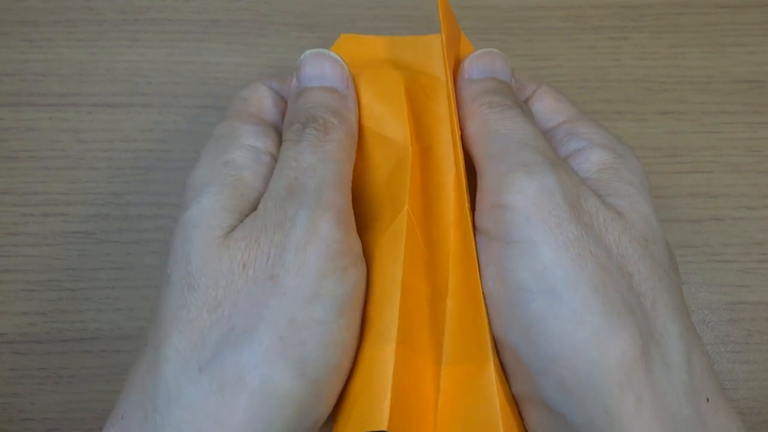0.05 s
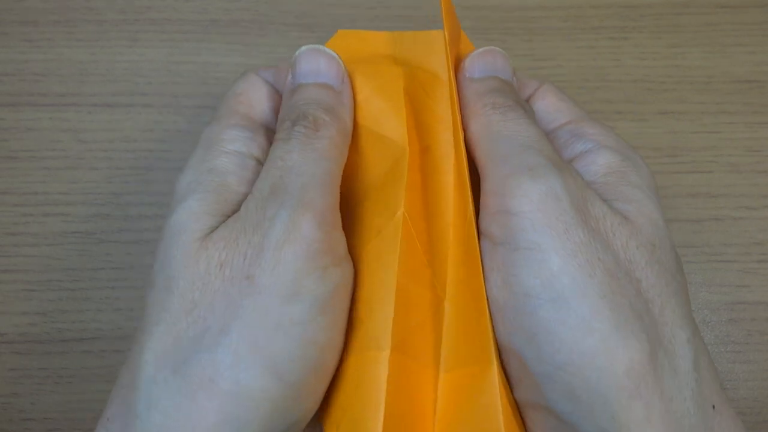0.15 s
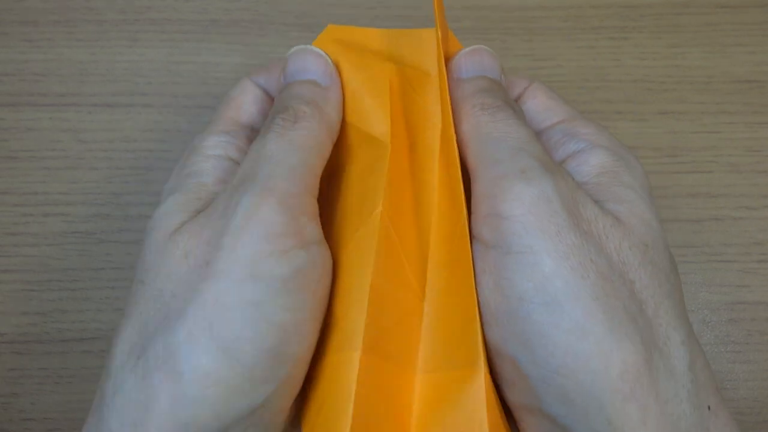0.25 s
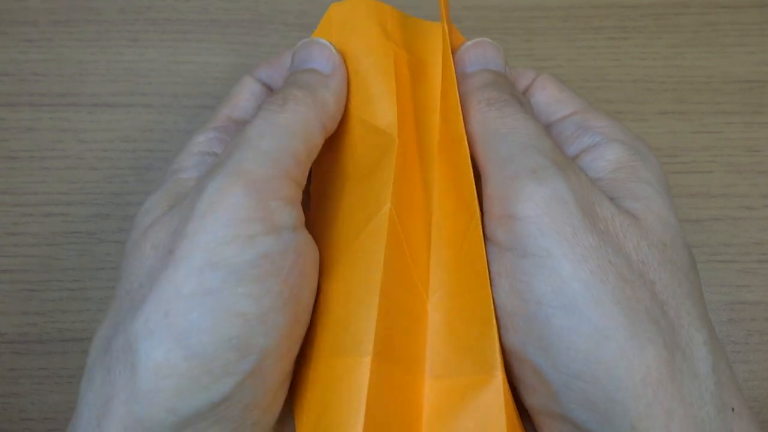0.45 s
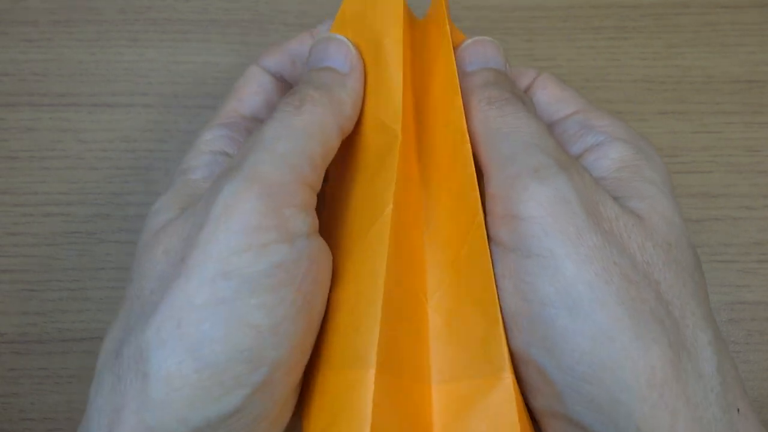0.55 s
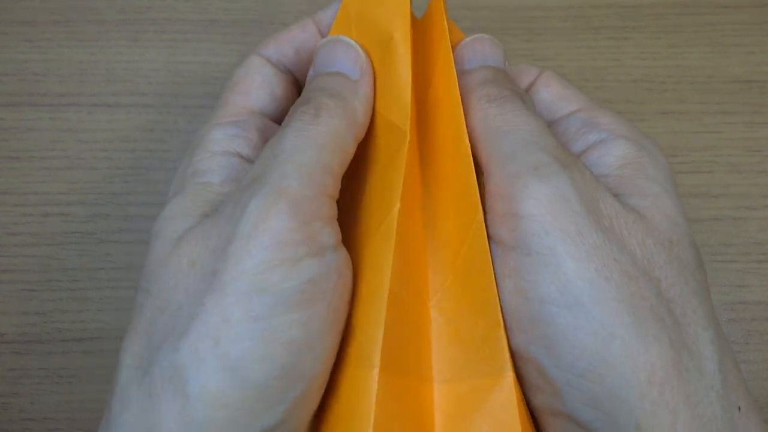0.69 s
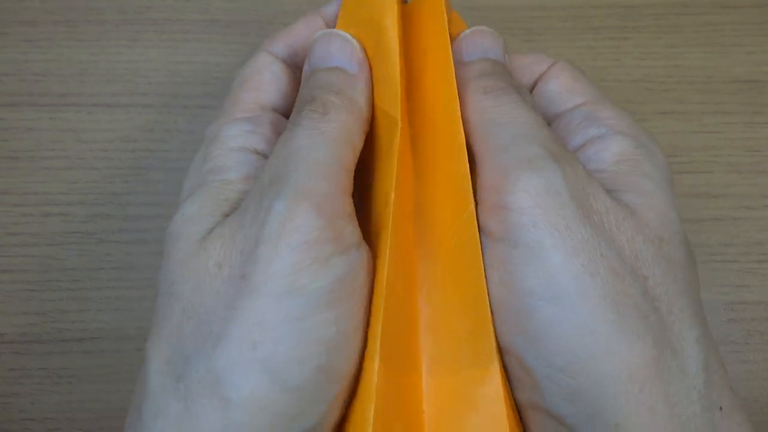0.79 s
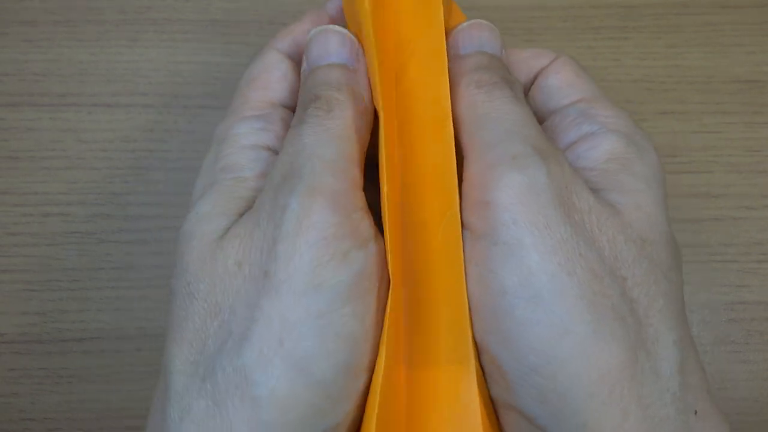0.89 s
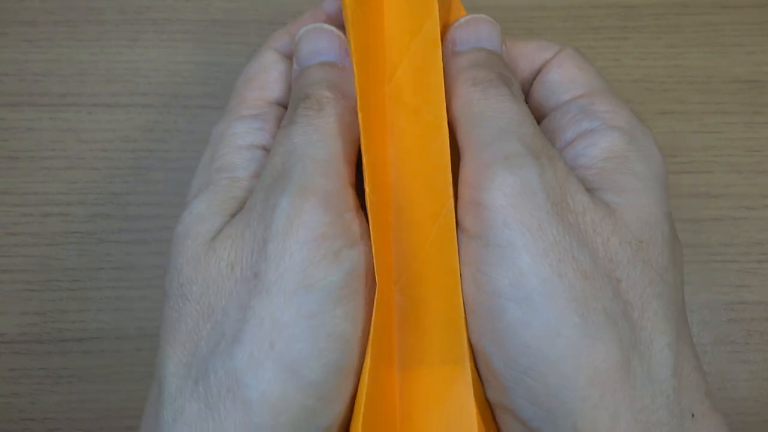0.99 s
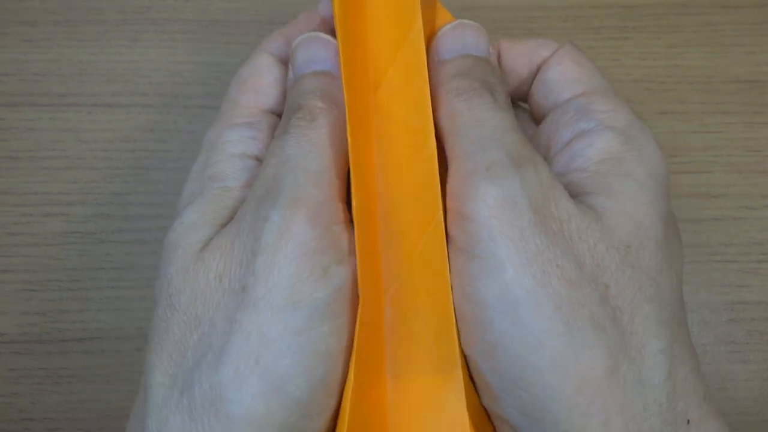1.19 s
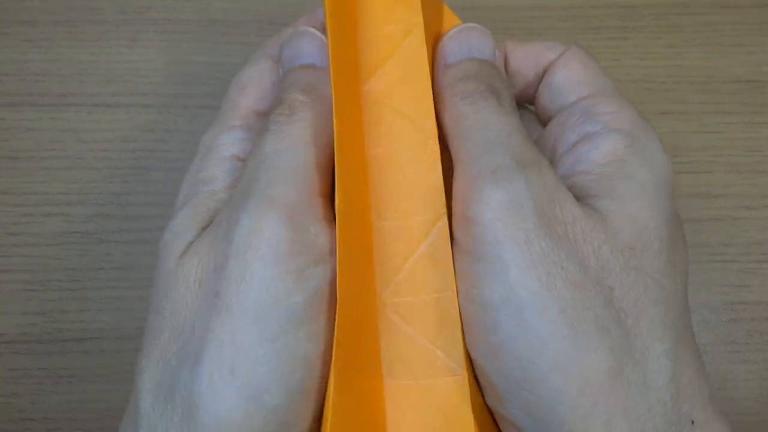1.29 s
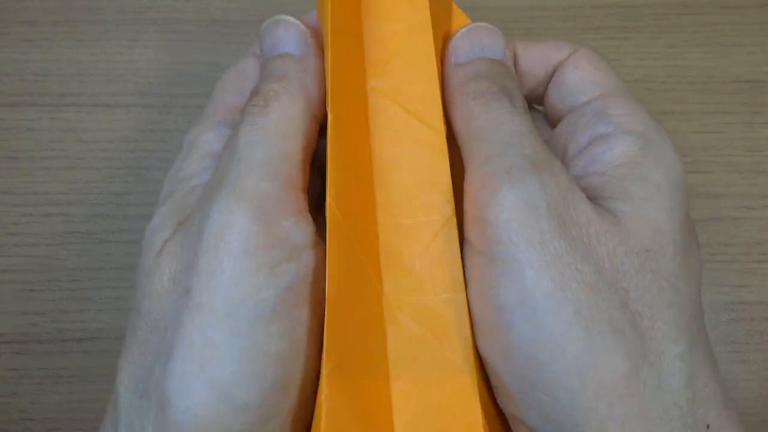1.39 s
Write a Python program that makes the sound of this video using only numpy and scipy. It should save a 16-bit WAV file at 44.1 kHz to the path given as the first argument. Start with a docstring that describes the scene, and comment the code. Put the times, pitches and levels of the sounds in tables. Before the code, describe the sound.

Stiff folded paper crackles sharply as hands press its creases together, with brief dry sliding rustles

```python
"""Buckling and sliding of folded paper

Two hands press a stiff, folded sheet together on a table, close to the microphone in a small room.
Creases buckle with sharp snaps: shaped noise bursts that ring a panel, some with a low flap of damped sines.
Paper slides on paper as a hiss of noise, fibre grains and creaks; once it catches in a short scrape of ticks.
The room answers faintly through a decaying-noise response, over its own quiet floor of coloured noise."""
import sys
import numpy as np
from scipy import signal
from scipy.fft import rfft, irfft
from scipy.io import wavfile
from scipy.ndimage import uniform_filter1d, map_coordinates

SR = 44100
rng = np.random.default_rng(int(sys.argv[2]) if len(sys.argv) > 2 else 0)


def inscribe(sig):
    """Save sig as 16-bit PCM at rate SR to the path in sys.argv[1].

    A 1-D sig is mono; a 2-D sig holds one channel per row.
    Samples are clipped to [-1, 1] before scaling.
    """
    pcm = np.round(np.clip(np.atleast_2d(sig).T, -1, 1) * 32767)
    wavfile.write(sys.argv[1], SR, pcm.astype(np.int16))


N = 63945  # length in samples
TOP_HZ = 11100  # upper band limit


def amp(db):
    """Level as a logarithm: decibels to amplitude ratio."""
    return 10 ** (np.asarray(db) / 20)


def unit(x):
    """Mean power: scale to rms 1."""
    return x / np.sqrt(np.mean(x ** 2) + 1e-20)


def along(points, hz):
    """Logarithmic frequency scale: interpolate (f/Hz, value) points on it."""
    f, values = np.transpose(points)
    f = np.maximum.accumulate(f)  # frequencies must not descend
    return np.interp(np.log(hz + 1), np.log(f + 1), values)


def colour(x, points, size=4096):
    """Minimum phase: a causal filter through (f/Hz, level/dB) points, by folding the cepstrum."""
    gain = amp(along(points, np.fft.rfftfreq(size, 1 / SR)))
    cepstrum = irfft(np.log(gain))
    cepstrum[1:size // 2] *= 2
    cepstrum[size // 2 + 1:] = 0
    impulse_response = irfft(np.exp(rfft(cepstrum)))
    return signal.fftconvolve(x, impulse_response)[:len(x)]


def add(track, s, x):
    """Superposition: mix x into the track at s seconds."""
    part = track[max(round(s * SR), 0):][:len(x)]
    part += x[:len(part)]


def fade(t, t60):
    """Exponential damping: decay by 60 dB in t60 seconds."""
    return np.exp(-np.log(1000) * t / t60)


def burst(envelope, count=3):
    """Broadband impulse: enveloped noise of energy 1, its spectrum evened out in a few passes."""
    x = rng.standard_normal(len(envelope)) * envelope
    for _ in range(count):
        z = rfft(x)
        local_power = uniform_filter1d(abs(z) ** 2, size=60)
        x = irfft(z / np.sqrt(abs(local_power) + 1e-12), len(x))
        x = x * (envelope > envelope.max() / 1000)
    return x / np.linalg.norm(x)


def grains(rate):
    """Random point process: sparse impulses of uneven size, rate per second, rms 1."""
    struck = rng.random(N) < rate / SR
    return unit(struck * rng.standard_normal(N))


# spectrum of the room's quiet air: f/Hz, relative level/dB
AIR_SPECTRUM = [(25, -28.5), (70, -27.5), (120, -18), (200, -11.5), (340, 1), (550, -10.5), (900, 2),
                (1250, -10), (1750, -1.5), (2100, -15.5), (2700, -6.5), (4000, -12.5), (11000, -37.5)]
FLOOR_DB, FLOOR_SIDE_DB = -65, -7  # rms of the mid; side relative to mid


def floor():
    """Stationary random noise: the quiet air of the room, partly incoherent between the channels."""
    mid, side = [unit(colour(rng.standard_normal(N), AIR_SPECTRUM)) for _ in range(2)]
    side = amp(FLOOR_SIDE_DB) * side
    return amp(FLOOR_DB) * np.array([mid + side, mid - side])


# course of the sliding of paper on paper: t/s, hiss level before its waver/dB
SLIDE_COURSE = [(0, -55.5), (.07, -66), (.11, -64.5), (.16, -54.5), (.2, -45.5), (.245, -41.5),
                (.29, -44.5), (.318, -44), (.35, -39), (.385, -45.5), (.415, -51.5), (.465, -45),
                (.505, -41), (.52, -57.5), (.57, -39), (.58, -40), (.63, -53), (.665, -52), (.7, -41),
                (.72, -46), (.77, -47), (.81, -55.5), (.87, -55), (.91, -59), (1.02, -69.5), (1.1, -63),
                (1.17, -70.5), (1.36, -75.5), (1.41, -61), (1.45, -70)]
# spectrum of the friction hiss: f/Hz, relative level/dB
HISS_SPECTRUM = [(100, -34.5), (300, -6.5), (600, -10.5), (1000, 0.5), (1500, 2), (2500, 4), (4000, 4.5),
                 (6500, 4), (9000, 4.5), (11000, 4.5)]
# spectrum of the faint creaks of the bent sheet: f/Hz, relative level/dB
CREAK_SPECTRUM = [(100, -44.5), (400, -15), (750, 2), (1500, -7.5), (2700, -0.5), (4500, -4),
                  (11000, -29.5)]
FIBRES_PER_S, FIBRE_DB = 1100, -12  # grain level relative to the smooth noise
CREAKS_PER_S, CREAK_DB = 110, -11  # relative to the mid hiss
PAPER_SIDE_DB, SLIDE_WAVER_DB = -11, 1  # side relative to the mid hiss; size of the level waver


def slide():
    """Sliding friction: brushing fibres give a hiss, with fine grains and faint creaks, that follows the slide."""
    t = np.arange(N) / SR
    waver = map_coordinates(rng.standard_normal(400), [t * 60])  # 60 random values a second, smoothly joined
    level = amp(np.interp(t, *np.transpose(SLIDE_COURSE)) + SLIDE_WAVER_DB * waver)
    friction = rng.standard_normal(N) + amp(FIBRE_DB) * grains(FIBRES_PER_S)
    mid_spectrum = HISS_SPECTRUM + [(TOP_HZ + 500, -6), (TOP_HZ + 2000, -40)]
    hiss = unit(colour(friction, mid_spectrum))
    side = amp(PAPER_SIDE_DB) * unit(colour(rng.standard_normal(N), HISS_SPECTRUM))
    creaks = amp(CREAK_DB) * unit(colour(grains(CREAKS_PER_S), CREAK_SPECTRUM))
    mid = hiss + creaks
    return level * np.array([mid + side, mid - side])


# reverberation time of the room: f/Hz, T60/s
REVERBERATION = [(200, 0.99), (800, 0.52), (2700, 0.35), (6000, 0.29), (11000, .17)]
ROOM_DB, ROOM_DELAY_S = -19, 0.007  # tail level; the tail fades in from 0.5 to 1.5 delays
WALLS_DB, WALLS_T60_S = -19.5, .035  # early echoes
ROOM_SIDE_DB = -2.5  # gain of the side response


def room(x):
    """Reverberation as convolution: early echoes from the table and near things, then a short tail."""
    hz, t, z = signal.stft(rng.standard_normal((2, SR // 2)), SR, nperseg=256)
    decay = fade(t, along(REVERBERATION, hz)[:, None])
    tail = signal.istft(z * decay, SR, nperseg=256)[1]
    t = np.arange(tail.shape[1]) / SR
    tail = tail * np.clip(t / ROOM_DELAY_S - .5, 0, 1)
    mid, side = amp(ROOM_DB) * tail / np.linalg.norm(tail[0])
    sparse = rng.standard_normal(tail.shape) * (rng.random(tail.shape) < .1)
    early = sparse * fade(t, WALLS_T60_S) * (t > .001)
    early = amp(WALLS_DB) * early / np.linalg.norm(early, axis=1, keepdims=True)
    mid = mid + early[0]
    side = amp(ROOM_SIDE_DB) * (side + early[1])
    response = np.array([mid + side, mid - side])
    return signal.fftconvolve(x[None], response, axes=1)[:, :N]


# buckling creases: t/s, crack time scale/ms, shiver drive level/dB, lowest panel resonance f/Hz,
# body level/dB, hollow level above the mean of body and mid/dB, mid level/dB, bite level/dB,
# fizz level/dB, ring f/Hz, ring level/dB
CREASE_SNAPS = [ (.1954, 0.67, -6.5, 954, -9.5, 5.5, -9, 1, -26, 2720, -1.5),
                (.2275, 0.66, 1, 1140, -14, 3, -22, -15, -13, 2900, -8),
                (0.2325, 1.8, -20, 1080, -5, 3, -5, -19.5, -17, 1470, 5.5),
                (.2775, 0.51, -2.5, 900, -6.5, 2, -9.5, -14, -10, 1723, -3),
                (0.3225, 1.4, 12, 970, -13.5, 3, -9, -25, -26.5, 1260, -16),
                (0.323, 1.22, -7.5, 1050, -1.5, 8, 4, 3.5, 13, 5850, 5.5),
                (0.5548, 0.66, -9.5, 1020, 2.5, -13, 14, 14, 9, 3564, 8),
                (.7047, 2.9, -10, 750, -4, -5, 0.5, -0.5, 0.5, 10000, 2.5),
                (0.7365, 0.94, -6, 1000, 6, -5.5, 10, 8.5, 9.5, 6250, -2),
                (0.8142, 1.26, -5, 985, 5, -6.5, -0.5, 3, -7, 2630, 5.5),
                (.8412, 1.8, -13, 850, -7.5, -11, -31, -28, -32, 2700, -8),
                (0.8566, 1, 4, 730, -15.5, -1.5, -9, -19.5, -21, 3330, -12),
                (.8690, 0.59, -0.5, 830, -16, 9, -44, -31, -26, 950, -8),
                (.8804, 0.9, -4.5, 650, -5, -4, 4.5, -1, -5, 2850, 7),
                (.9770, 7.5, -0.5, 604, -22, -6, -21, -28, -29, 855, -20),
                (1.0970, 6.2, -6, 873, -22, -8, -25, -23.5, -26.5, 3020, -14),
                (1.4425, 1.4, -1, 740, -3.5, -13, -11, -11.5, -62, 1360, -3)]
BODY_HZ, MID_HZ, BITE_HZ, FIZZ_HZ = 1150, 2480, 3900, 8500  # where the four levels of a snap apply
HOLLOW_HZ = 1550  # where the hollow in a snap's spectrum lies, as from its reflection off the table
# relative to the body: at the lowest resonance, one octave and three octaves under it
PANEL_DB, BELOW_DB, DEEP_DB = 5.5, -13, -27
CRACK_DB = -3.7  # drive level of the crack
SHIVER_T60_S, SHIVER_TOP_HZ = 0.027, 10400  # the shiver is a little duller than the crack
RING_Q = 4.2  # of each of two resonator passes: paper damps its panels quickly


def snaps(size=4096):
    """Snap-through buckling: a crease gives a short crack, the shiver of the sheet and one ringing panel."""
    out, t = np.zeros(N), np.arange(size) / SR
    dull = signal.butter(1, min(SHIVER_TOP_HZ, SR / 2 - 1), fs=SR)
    for s, ms, shiver_db, low_hz, body, hollow, mid, bite, fizz, ring_hz, ring_db in CREASE_SNAPS:
        u = t / (ms / 1000)  # time in crack lengths
        crack = burst(np.sqrt(u + 1e-4) * np.exp(-1.6 * u ** 2))
        shiver_envelope = fade(t, SHIVER_T60_S) * (1 - np.exp(-u ** 2))
        shiver = signal.lfilter(*dull, burst(shiver_envelope))
        force = amp(CRACK_DB) * crack + amp(shiver_db) * shiver
        shape = [
            (low_hz / 8, body + DEEP_DB), (low_hz / 2, body + BELOW_DB),
            (low_hz * 0.79, body - 5), (low_hz, body + PANEL_DB),
            (BODY_HZ, body), (HOLLOW_HZ, (body + mid) / 2 + hollow),
            (MID_HZ, mid), (BITE_HZ, bite), (FIZZ_HZ, fizz)]
        panel = signal.iirpeak(ring_hz, RING_Q, fs=SR)
        ring = signal.lfilter(*panel, signal.lfilter(*panel, force))
        add(out, s, colour(force, shape) + amp(ring_db) * ring)
    return out


# flexing of the whole sheet under the hard snaps: t/s, f/Hz, level before rise and damping/dB
SHEET_FLEXES = [(.2774, 706, -26), (0.3237, 363, -45), (0.555, 364, -41), (.7062, 683, -25.5),
                (.7366, 454, -23), (0.8155, 427, -29), (0.8793, 682, -28.5)]
FLEX_T60_S, FLEX_RISE_S = .018, .0012


def flexes():
    """Damped free vibration: the low, quickly dying flap of the whole sheet."""
    out, t = np.zeros(N), np.arange(SR // 10) / SR
    envelope = fade(t, FLEX_T60_S) * (1 - np.exp(-t / FLEX_RISE_S)) ** 2
    for s, hz, db in SHEET_FLEXES:
        add(out, s, amp(db) * np.sin(2 * np.pi * hz * t) * envelope)
    return out


# stick-slip scrapes: t/s, length before the decay/s, rms level of the ungated ticks/dB, spectral peak f/Hz
EDGE_SCRAPES = [(0.48, 0.0054, -36.5, 3080), (0.488, 0.0057, -35.5, 2540), (0.4937, 0.0031, -32, 2015),
                (.5005, 0.0045, -33.5, 5410)]
SLIPS_PER_S, SLIP_SCATTER_DB = 1500, 4  # mean rate; standard deviation of the slip sizes
SCRAPE_SKIRT_DB, SCRAPE_T60_S = -17, .016  # level at 3.5 times the peak frequency; final decay


def scrapes(count=120):
    """Stick-slip friction: an edge catches and slips in a rapid, uneven train of ticks."""
    out, t = np.zeros(N), np.arange(SR // 10) / SR
    for s, length, db, hz in EDGE_SCRAPES:
        intervals = (rng.exponential(size=count) + 1) / 2 / SLIPS_PER_S
        times = np.cumsum(intervals)
        sizes = amp(SLIP_SCATTER_DB * rng.standard_normal(count)) * rng.choice([-1, 1], count)
        slips = np.bincount((times * SR).astype(int), sizes, minlength=len(t))[:len(t)]
        shape = [(hz / 20, -45), (hz / 6, -22), (hz * 0.53, -9), (hz * 0.91, -1),
                 (hz, 0), (hz * 3.5, SCRAPE_SKIRT_DB)]
        ticks = colour(slips, shape)
        gate = np.clip(t / 0.0013, 0, 1) * fade(np.maximum(t - length, 0), SCRAPE_T60_S)
        add(out, s, amp(db) * gate * ticks / np.std(ticks[t < length]))
    return out


PAN_DB = -.35  # gain of the left channel; the right gets the opposite


def scene():
    """Superposition of direct and reverberant sound: the paper, nearly centred, in the room."""
    paper = slide() + snaps() + flexes() + scrapes()
    balance = amp([[PAN_DB], [-PAN_DB]])
    return (paper + room(paper.mean(axis=0))) * balance + floor()


def record(dry):
    """Band limitation: a steep elliptic low-pass, 70 dB down in its stop band."""
    low_pass = signal.ellip(10, .2, 70, TOP_HZ, fs=SR, output="sos")
    return signal.sosfilt(low_pass, dry)


dry = scene()
out = record(dry)
inscribe(out)
```